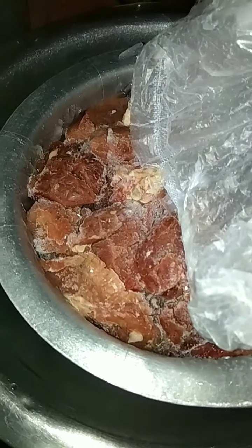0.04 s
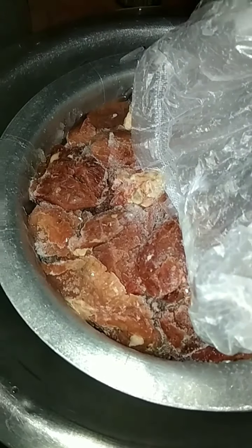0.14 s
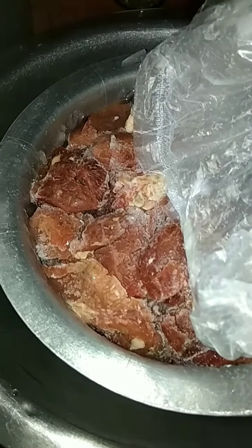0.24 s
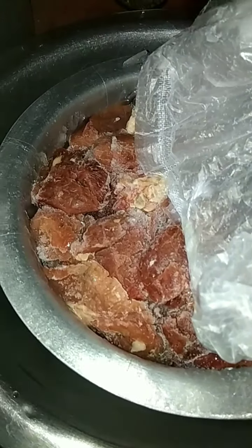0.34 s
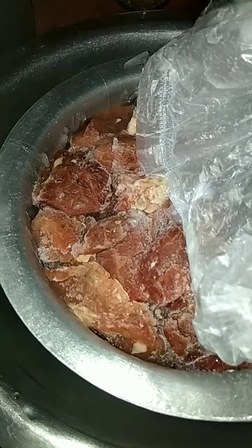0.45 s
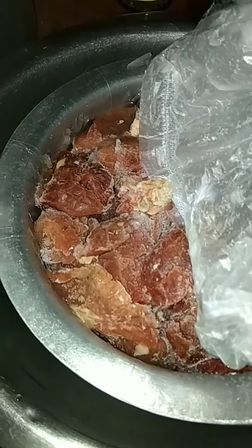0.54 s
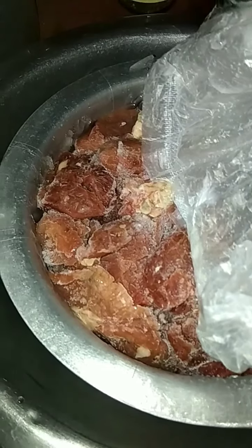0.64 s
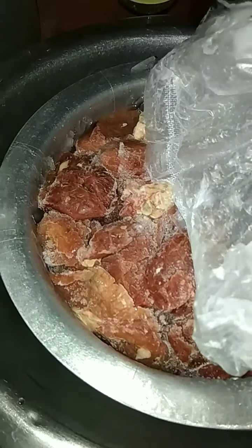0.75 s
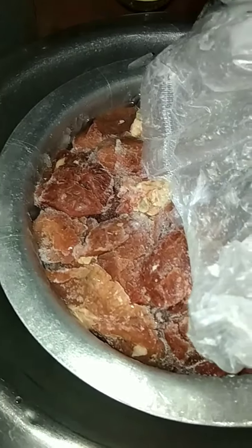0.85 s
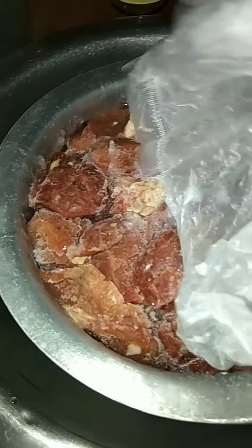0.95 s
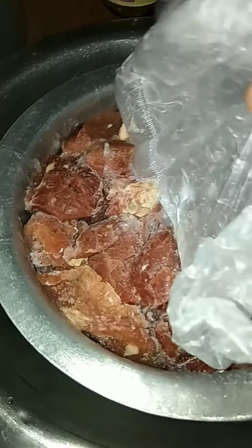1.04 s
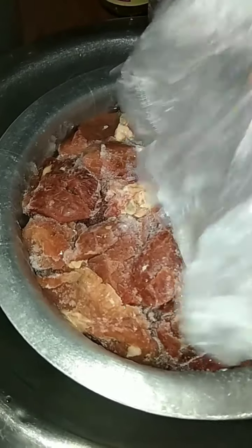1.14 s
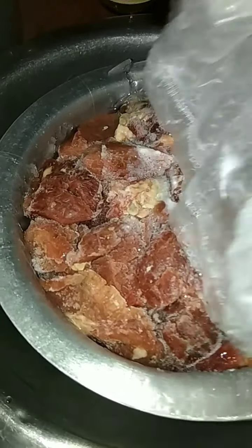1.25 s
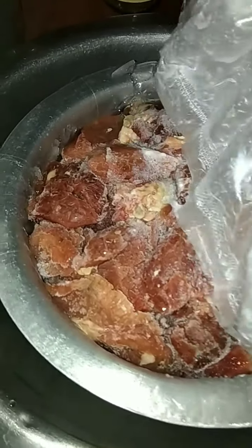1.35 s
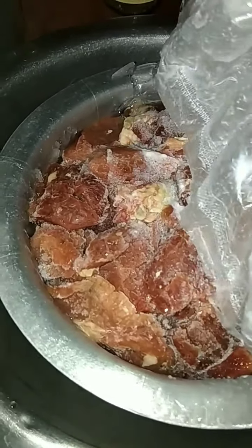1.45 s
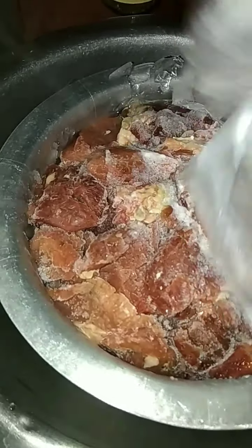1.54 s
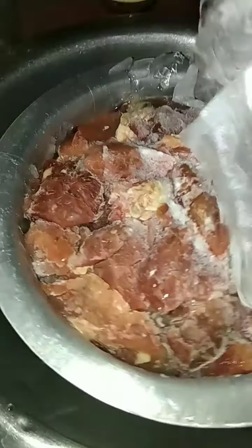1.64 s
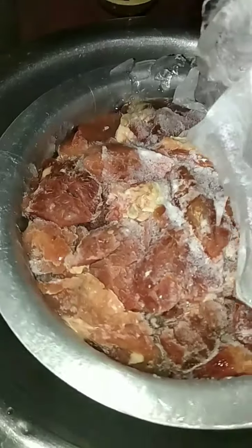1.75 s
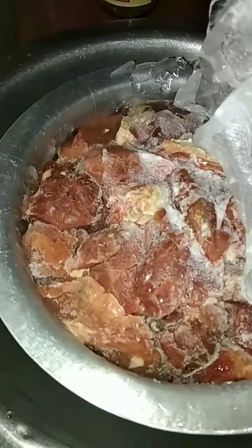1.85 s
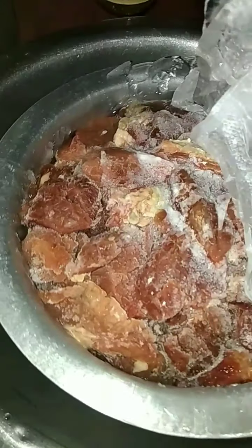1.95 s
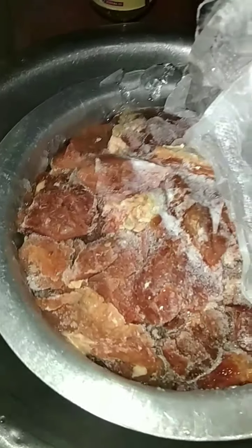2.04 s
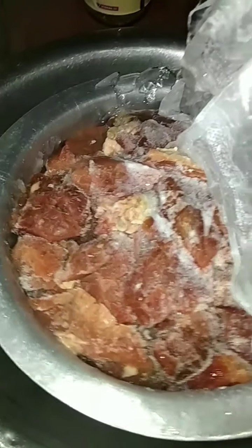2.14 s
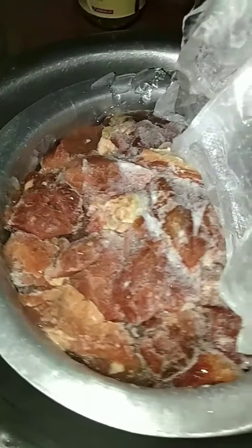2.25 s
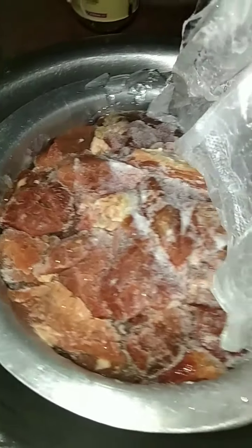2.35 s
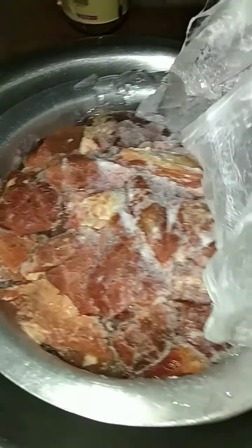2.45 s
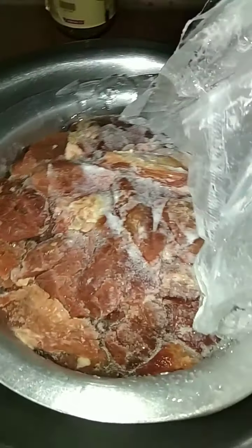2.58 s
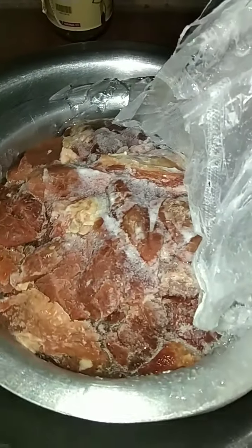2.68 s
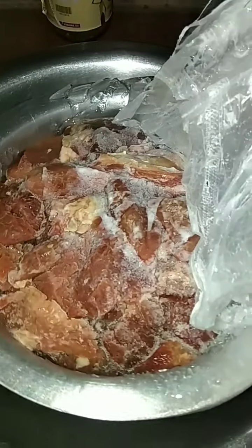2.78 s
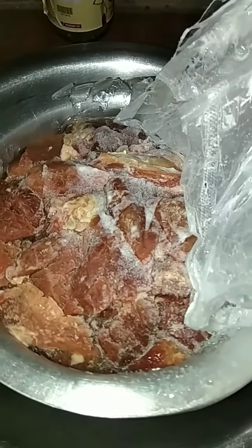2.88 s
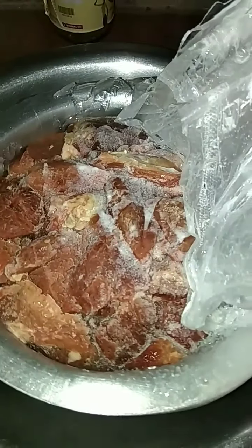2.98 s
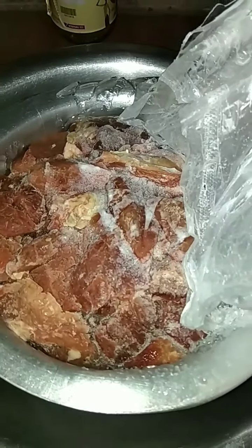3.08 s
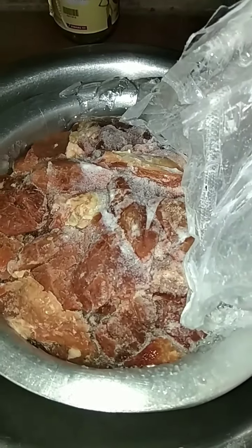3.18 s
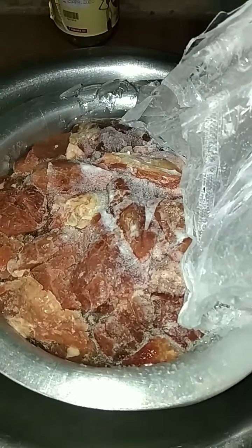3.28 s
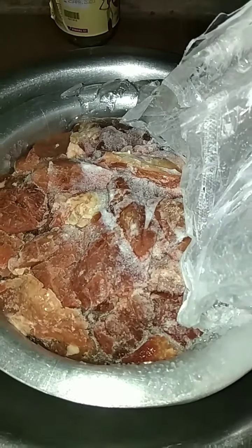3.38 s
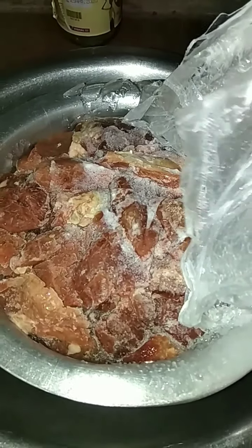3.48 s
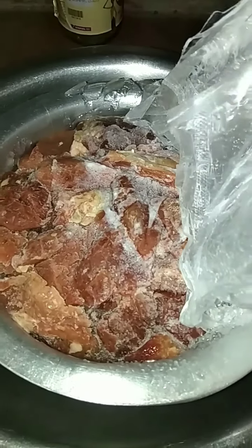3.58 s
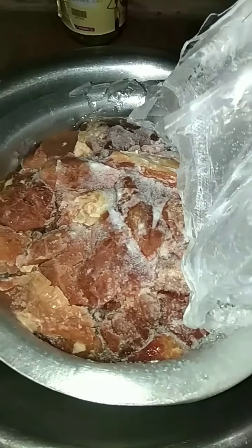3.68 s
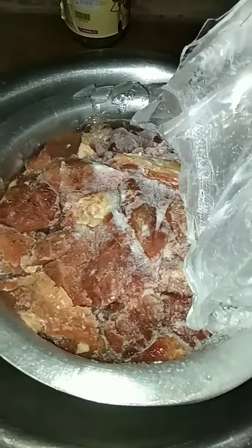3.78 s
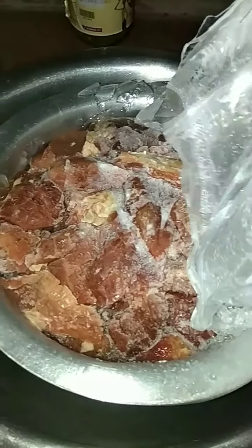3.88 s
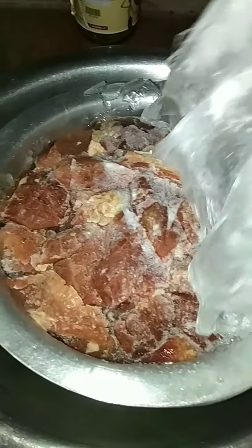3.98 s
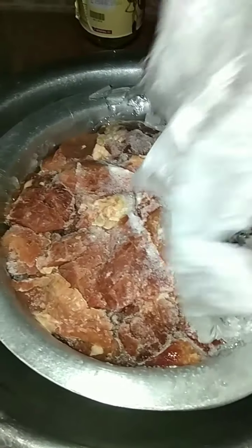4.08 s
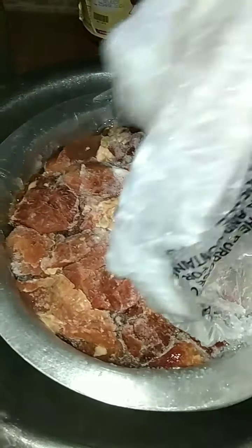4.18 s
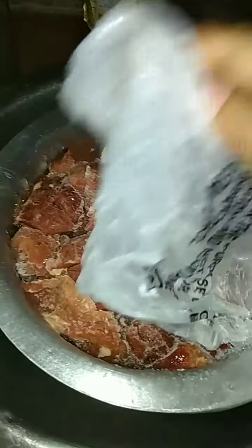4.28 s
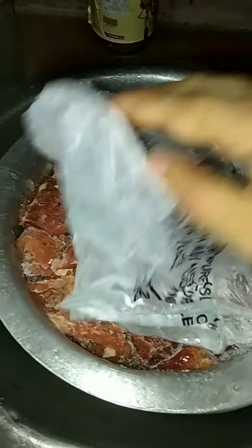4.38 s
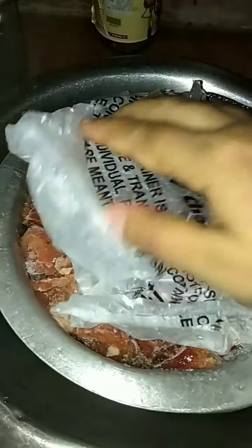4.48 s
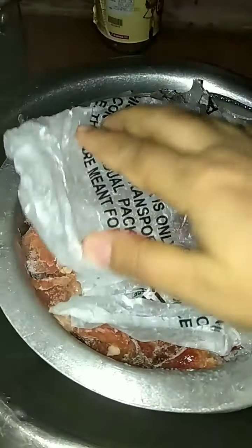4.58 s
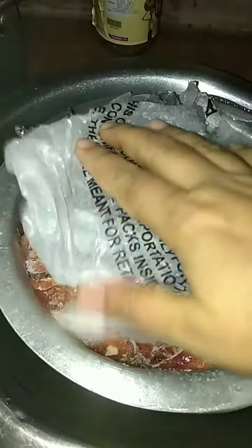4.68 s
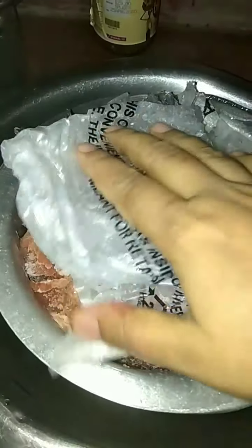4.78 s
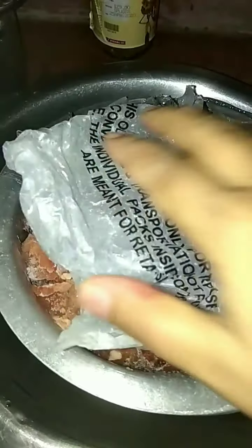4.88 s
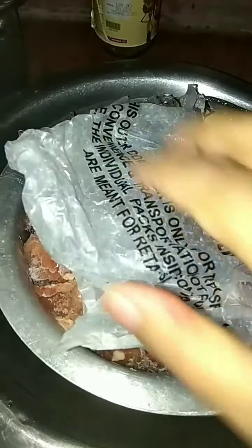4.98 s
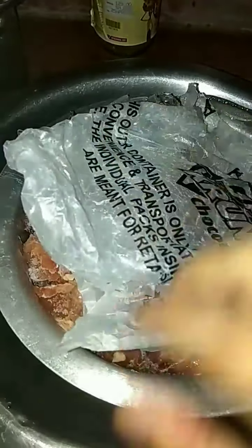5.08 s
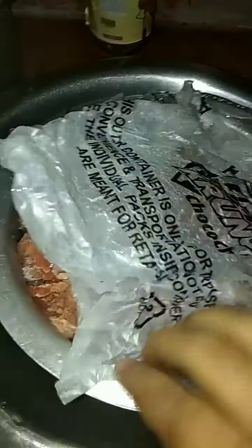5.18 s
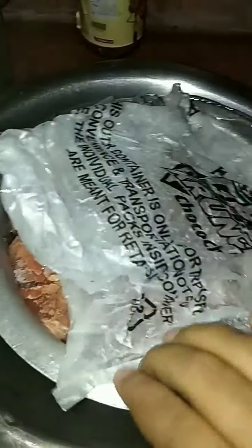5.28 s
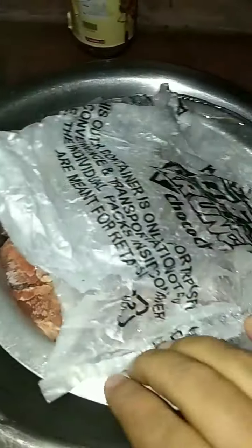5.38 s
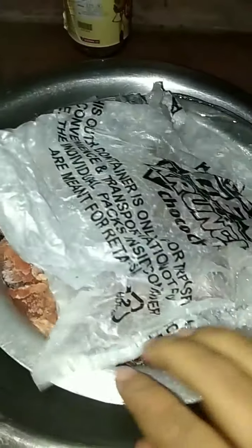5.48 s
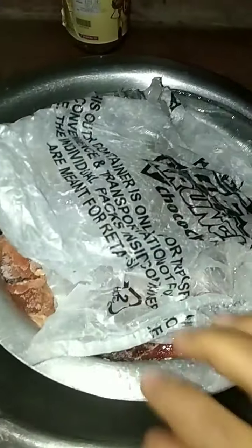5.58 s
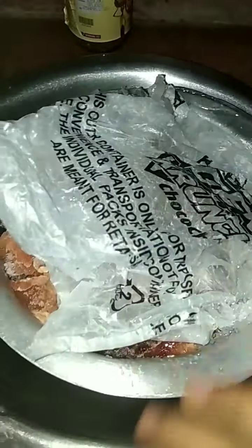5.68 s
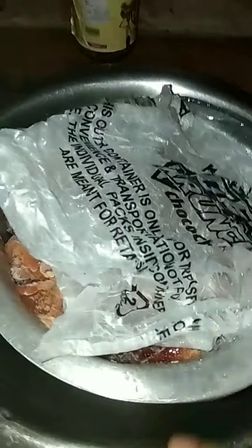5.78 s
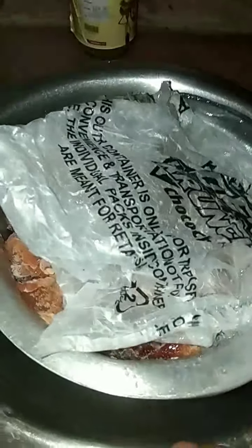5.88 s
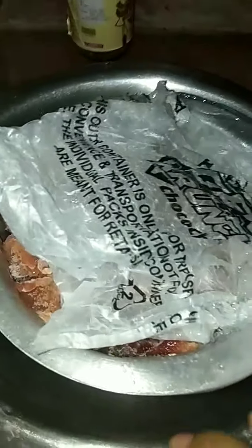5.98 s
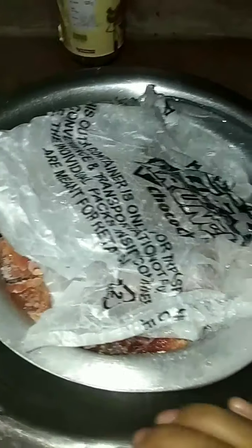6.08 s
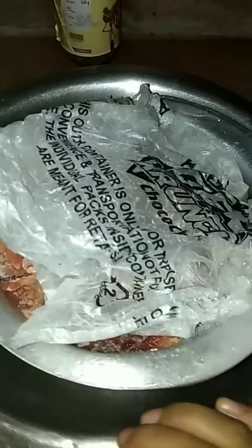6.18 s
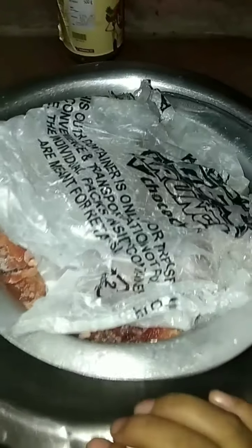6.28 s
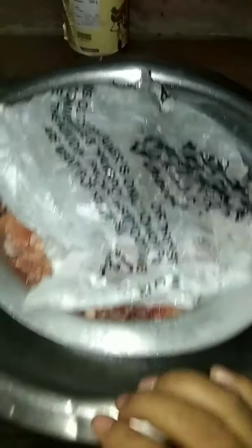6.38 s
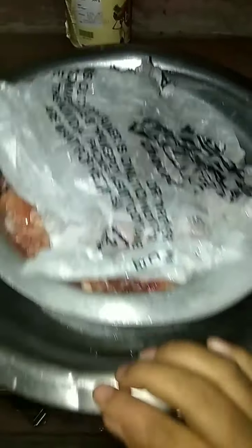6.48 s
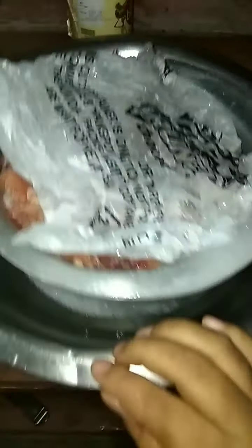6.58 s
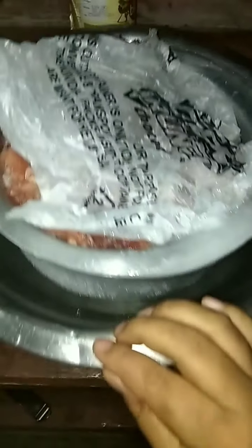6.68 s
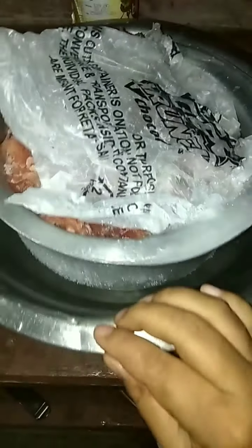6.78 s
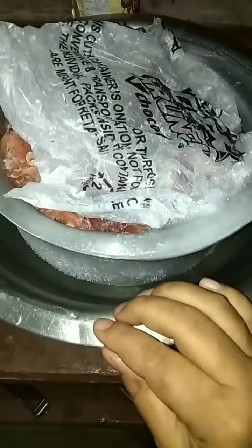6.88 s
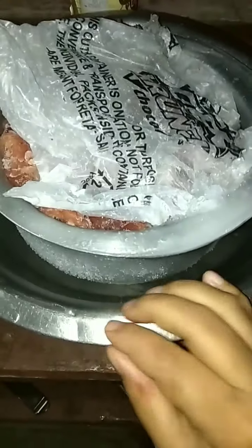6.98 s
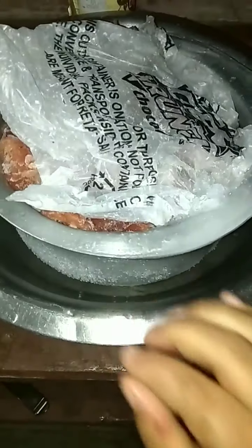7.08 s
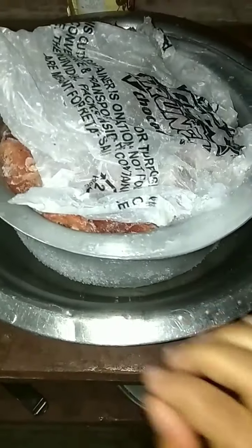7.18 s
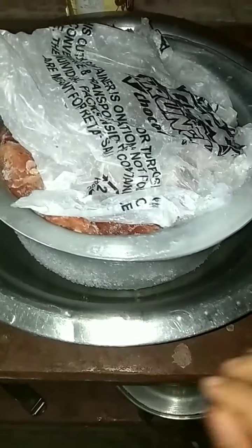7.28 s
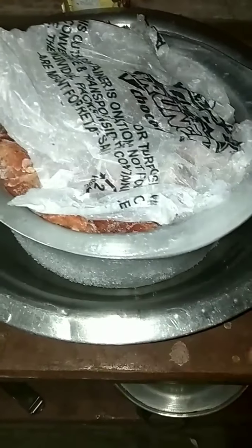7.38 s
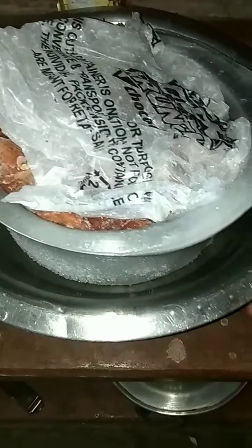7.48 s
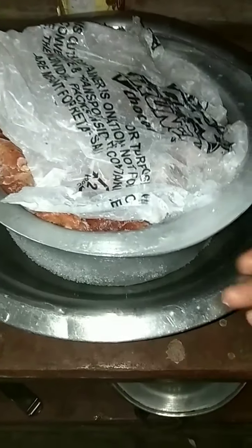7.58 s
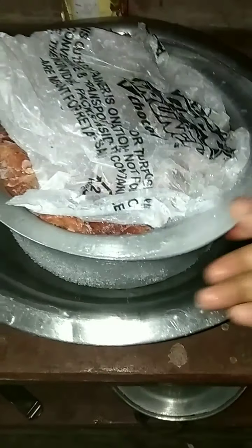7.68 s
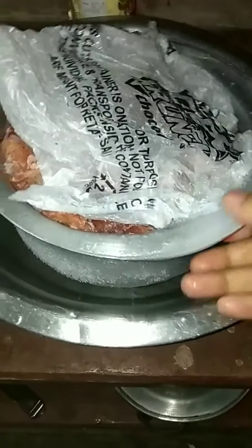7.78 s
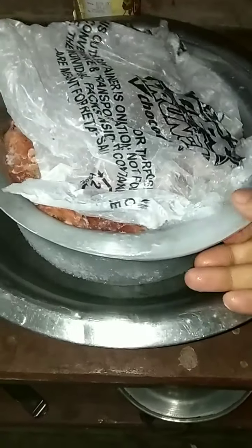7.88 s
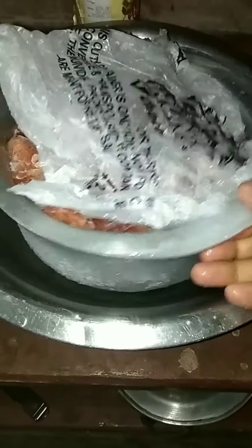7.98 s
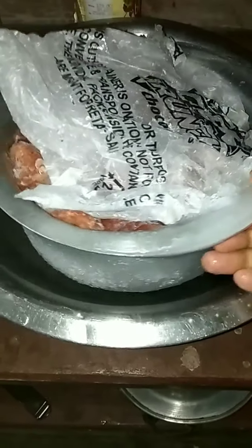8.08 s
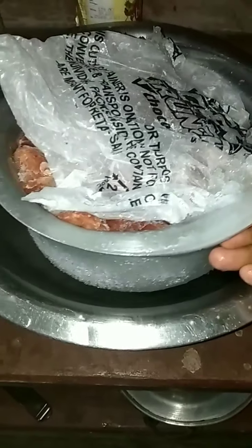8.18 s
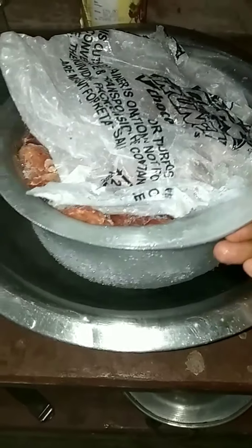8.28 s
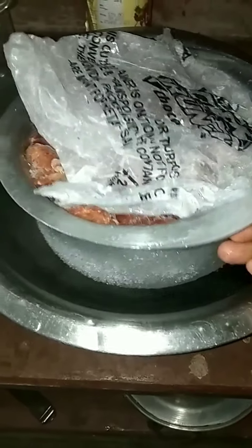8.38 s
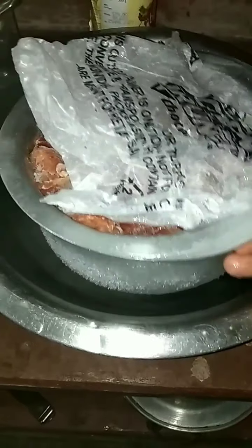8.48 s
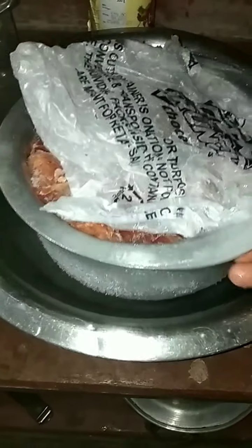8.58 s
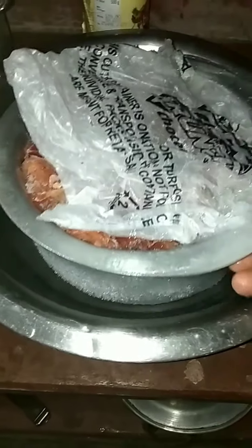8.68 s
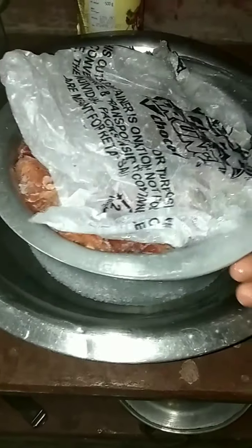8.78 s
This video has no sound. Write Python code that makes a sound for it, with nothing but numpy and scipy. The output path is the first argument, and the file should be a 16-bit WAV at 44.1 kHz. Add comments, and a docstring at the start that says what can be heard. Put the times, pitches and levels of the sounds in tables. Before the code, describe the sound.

Bright, dry plastic crinkling bursts out with sharp snaps, subsides to tiny crackles, then returns in shorter rustles. Two hoarse distant caws overlap the handling. A brief metallic scrape and a cluster of clanks follow, then isolated softer basin knocks over low thuds. Close stereo pickup, small room with short reflections, soft hiss and low hum, occasional faint echoing birdsong from outside.

```python
"""A stiff plastic bag is peeled off frozen meat in a metal bowl, laid back and patted down, close to
two microphone ports a hand apart: creases ring at many pitches, single pops spit bright noise.
Ice pings the bowl; the basin under it is dragged and knocked, ringing metal modes over counter thuds.
Around it: a quiet kitchen of banded noise, hiss and low hum, a far crow of hoarse overtones, and a
small bird outside whose gliding whistle is smeared by echoes."""
import sys
import numpy as np
from scipy import signal
from scipy.fft import rfft, irfft, next_fast_len
from scipy.io import wavfile

SR = 44100
rng = np.random.default_rng(int(sys.argv[2]) if len(sys.argv) > 2 else 0)


def generate_wav(signal):
    """Clip the signal to [-1, 1] and save it as 16-bit WAV at the path in sys.argv[1]."""
    frames = np.transpose(np.atleast_2d(signal))
    scaled = np.clip(frames, -1, 1) * 32767
    pcm = np.round(scaled).astype(np.int16)
    wavfile.write(sys.argv[1], SR, pcm)


N = 389844

# colour of the room tone: (frequency [Hz], relative level [dB])
AIR_COLOUR = [(22, 0.5), (33, -35), (45, -12.5), (90, -17), (140, -18.5), (220, -25.5), (370, -19),
              (600, -23.5), (1300, -28), (2500, -35), (5700, -38.5), (8000, -43), (13000, -42.5)]
# room tone shared by both ports: (frequency [Hz], likeness [0-1])
PORT_LIKENESS = [(60, 0.81), (300, 1), (640, 0.33), (1400, 0.01)]
AIR_DB, AIR_PATCHY_DB = -47.5, 1.2
HISS_HZ, HISS_WIDTH_HZ, HISS_DB = 10040, 1200, -66
HUM_HZ, HUM_WIDTH_HZ, HUM_DB = 57.3, 6.9, -58
HUM_SWING_DB, HUM_PERIOD_S, HUM_TOP_S = 3, 2.43, .47   # a steady swell, first loudest at HUM_TOP_S

# calls of the small bird outside: (start [s], level [dB])
BIRD_CALLS = [(0.155, -51), (3.19, -60.5), (5.89, -57.5), (7.984, -56.5)]
SLUR_S, SLUR_FROM_HZ, SLUR_TO_HZ, SLUR_DB = .095, 5750, 4500, -5
TRILL_S, TRILL_LOW_HZ, TRILL_HIGH_HZ, TRILL_PER_S = .22, 4450, 6550, 42
YARD_FADE_S = .035   # echoes off walls outside

# single creases popping: (time [s], pop level [dB], thick fold part relative to the pop [dB])
CREASE_POPS = [(0.465, -30, -15), (0.5392, -38, -27), (0.572, -34, -18), (0.5932, -28, -15.5),
               (0.6487, -28, -33), (0.7738, -24.5, -13), (1.076, -11, -32), (1.252, -7.5, -35),
               (1.323, -20, -12.5), (1.3807, -16, -35), (1.734, -27, -7), (1.8569, -22, -13.5),
               (2.039, -18.5, -31), (2.3, -26, -12), (2.345, -13.5, -50), (2.4991, -26, -4),
               (2.647, -19, -25), (2.676, -20.5, -16), (2.726, -15.5, -17.5), (2.7893, -24.5, -39),
               (2.875, -31, -26), (3.004, -29, -38), (3.016, -29.5, -12), (3.03, -36, -28),
               (3.119, -30, -14), (3.174, -27, -13.5), (3.1925, -32, -30), (3.24, -31, -37),
               (3.306, -29.5, -9.5), (3.485, -32.5, -9), (3.4955, -32, -25), (3.531, -32, -23),
               (3.68, -31, -11.5), (3.7582, -26.5, -23), (3.8136, -35, -24), (4.251, -18.5, -13),
               (4.421, -12, -16), (4.592, -20, -35), (5.1502, -24, -39), (5.228, -27, -8.5),
               (5.329, -35, -28), (5.521, -29.5, -11), (5.847, -36, -35), (6.2245, -21, -41),
               (6.3877, -12.5, -18), (7.061, -33, -28), (7.497, -35, -17), (8.338, -22, -35),
               (8.527, -43.5, 2), (8.757, -23, -56)]
POPS_PER_S, POP_DB, POP_SPREAD_DB = 110, 4, 3.0   # unlisted pops, against the crinkle level

# long pulls on the film, one curve each (peeling, easing off, laying back, riding the dragged basin):
# (time [s], crinkle level [dB])
FILM_PULLS = [
    [(0.83, -48), (0.855, -36.5), (1.02, -30.5), (1.07, -32), (1.1, -23), (1.2, -22), (1.31, -44.5),
     (1.4, -35.5), (1.495, -31), (1.52, -15.5), (1.555, -19), (1.7, -39.5), (1.86, -45), (1.95, -58.5)],
    [(2.16, -57), (2.29, -49.5), (2.345, -40.5), (2.4, -44), (2.5, -37.5), (2.72, -49), (2.78, -68)],
    [(3.945, -47.5), (3.98, -45), (4.41, -31), (4.655, -41), (4.71, -46.5)],
    [(6.23, -59), (6.32, -39.5), (6.46, -45.5), (6.62, -46), (6.73, -57)],
]
# short crumples that swell, then die away:
# (start [s], swell [s], top level [dB], fade [dB/s], extra thick folds [dB])
FILM_CRUMPLES = [(0.641, 0.0083, -38, 140, 6.5), (1.32, 0.0039, -30, 260, -10),
                 (1.378, 0.0028, -30, 303, -19), (1.931, 0.031, -46, 261, 2), (2.033, 0.002, -48, 352, -3),
                 (2.865, 0.0044, -45, 330, -7.5), (3.009, 0.0079, -50.5, 294, 3),
                 (3.17, 0.048, -56.5, 82, 5.5), (3.47, 0.051, -54, 145, 4.5), (3.74, 0.021, -56.5, 52, 4),
                 (4.713, 0.003, -38.5, 250, -3), (4.724, 0.026, -32, 400, -0.5), (4.78, 0.03, -40, 199, 3),
                 (5.133, 0.024, -35.5, 160, 0), (5.15, 0.032, -36, 216, -1.5), (5.3, 0.017, -48.5, 250, 1),
                 (5.44, 0.067, -46, 220, -1.5), (6.223, 0.0037, -46.5, 348, 6),
                 (6.734, 0.0047, -36, 300, 1.5), (6.778, 0.0071, -41, 260, 2),
                 (7.997, 0.002, -44.5, 330, 5.5), (8.307, 0.042, -40, 518, 4), (8.428, 0.011, -52, 248, 6),
                 (8.746, 0.014, -43, 260, 0)]
# colour of the crinkling film: (frequency [Hz], relative level per Hz [dB])
FILM_COLOUR = [(290, -36), (500, 2), (678, -16), (819, -18.5), (1260, -16), (1400, -15.5), (3020, -17),
               (6510, -9.5), (10100, -3.5), (13300, 3), (16000, -1.5)]
SWELL_DB = 20   # a crumple starts this far under its top
# level of the duller crackle against the bright at a crinkle level of FIRM_DB,
# and its change per dB of crinkle level
FOLDS_DB, FOLDS_PER_DB, FIRM_DB = -10.5, -0.0869, -28
BOOM_LAG_S, BOOM_FOLLOWS = 0.0011, 1.2   # the bowl answers late, and most to firm handling

# ice cracking off the bowl: (time [s], level [dB])
ICE_CRACKS = [(0.652, -41), (0.683, -40)]
# modes of the bowl: (frequency [Hz], relative level [dB], t60 [s])
BOWL_MODES = [(2104, 2, 0.19), (2840, -5, 0.12), (3750, -2.5, 0.16)]

# lurches of the counter: (start [s], level [dB])
COUNTER_JOLTS = [(1.14, -38), (1.55, -32.5), (6.95, -45.5), (8.02, -40.5), (8.75, -37.5)]
JOLT_HZ, JOLT_WIDTH_HZ, JOLT_SWELL_S = 54, 20, 0.048

# caws of the crow outside: (start [s], loudest [s], end [s], level [dB])
CROW_CAWS = [(4.698, 4.762, 5.085, -42.5), (5.323, 5.56, 5.8, -45.5)]
# overtones of the caw: (frequency [Hz], width [Hz], relative level [dB])
CAW_OVERTONES = [(1070, 45, 2.5), (1603, 90, 8.5), (1930, 150, 10.5), (2110, 140, 10.5)]

# the basin dragged over the counter: (time [s], scrape level [dB], mode driven best [Hz])
BASIN_DRAG = [(6.22, -59, 1010), (6.23, -45, 1000), (6.29, -41, 930), (6.33, -46, 960), (6.39, -44, 940),
              (6.42, -53, 920), (6.62, -57, 850), (6.64, -41, 1014), (6.665, -45, 975), (6.685, -41, 980),
              (6.71, -56, 900)]
# basin knocks: (time [s], metal level [dB], counter thud level [dB], mode driven best [Hz],
# share of the ring time the hand leaves [0-1])
BASIN_KNOCKS = [(6.2259, -35.5, -47, 1040, 0.3), (6.741, -25, -41, 1100, 0.34), (6.757, -43, -30, 1250, .3),
                (6.783, -22.5, -55, 1240, 0.61), (6.804, -40, -43, 1200, 0.9),
                (6.858, -37, -33.5, 890, 0.17), (6.884, -37.5, -35.5, 855, 0.26),
                (6.948, -46, -32.5, 835, 0.17), (7.501, -40, -50.5, 724, 0.13),
                (8.026, -28.5, -41, 550, 0.28), (8.049, -41, -33.5, 1390, 0.45),
                (8.334, -38, -52, 1300, 0.27), (8.444, -34, -47, 1370, 0.25), (8.559, -50, -41, 703, 0.2),
                (8.738, -30, -38, 570, 0.43), (8.76, -28, -37, 1230, 0.23), (8.783, -36, -37, 1000, 0.35),
                (8.812, -46, -47, 988, 0.4)]
# modes of the basin: (frequency [Hz], relative level [dB], free t60 [s])
BASIN_MODES = [(517, 9, 0.15), (826, 7, 0.25), (872, 5, 0.22), (933, 9, 0.2), (990, 9, 0.2),
               (1250, 10, 0.16), (1326, 9, 0.4), (1500, 14, 0.04), (1700, 8, .06), (2320, 6, 0.07),
               (5000, 9, 0.087)]
# thud modes of the counter: (frequency [Hz], relative level [dB], t60 [s])
COUNTER_MODES = [(149, -7.5, 0.095), (217, 0.5, 0.04), (290, -3.5, 0.2), (442, -19, 0.012)]
DRAG_RING_SHARE = .2   # the hand on the rim damps the ring
FOOT_DB_PER_OCTAVE = 80   # how narrowly the dragging foot picks its mode
GRIT_DB, GRIT_FOLLOWS = -47, 0.1   # broad rasp under the dragged foot

LEFT_LAG_S, LAG_SPREAD_S, LEFT_DB = .0003, .00015, -2.5   # left port against right
KITCHEN_T60_S, WALL_CUT_HZ, KITCHEN_DB = 0.11, 15700, -2.5
PORT_HZ, PORT_WIDTH_HZ, PORT_DB = 11100, 2100, 0.5   # resonance of the microphone ports
CUTOFF_HZ = 16700


def from_db(db):
    """Decibels to gain."""
    return 10 ** (np.asarray(db) / 20)


def lean_right(db):
    """Gains of the left and right port, this far either side of even."""
    return from_db([[-db], [db]])


def rms_one(x):
    """Scale to unit rms."""
    return x / np.sqrt(np.mean(x ** 2) + 1e-20)


def in_time(rows):
    """Columns of a curve table, sample by sample; -120 outside its span."""
    s, *columns = np.transpose(rows)
    return [np.interp(np.arange(N) / SR, s, c, left=-120, right=-120) for c in columns]


def at_hz(points, hz):
    """Read a table on a log-frequency axis."""
    table_hz, values = np.transpose(points)
    return np.interp(np.log(hz), np.log(table_hz), values)


def drift(rate):
    """Slow chance of spread 1, from low-passed noise drawn every 40 samples."""
    r = np.exp(-80 * np.pi * rate / SR)
    noise = rng.standard_normal(N // 40 + 2002)
    slow = signal.lfilter([1], [1, -2 * r, r * r], noise)[2000:]
    return np.interp(np.arange(N) / 40, np.arange(len(slow)), rms_one(slow))


def filtered(x, order, hz, kind):
    """Butterworth filter."""
    return signal.sosfilt(signal.butter(order, hz, kind, fs=SR, output="sos"), x)


def ring(force, hz, t60):
    """A damped mode: a unit click sets a sine of height 1 ringing."""
    r, w = from_db(-60 / (t60 * SR)), 2 * np.pi * hz / SR
    return signal.lfilter([0, np.sin(w)], [1, -2 * r * np.cos(w), r * r], force + 1e-18)


def resonance(force, hz, width_hz):
    """A mode given by its bandwidth instead of its ring time."""
    return ring(force, hz, np.log(1000) / (np.pi * width_hz))


def rising_noise():
    """Noise that weakens toward the bass."""
    return np.diff(rng.standard_normal(N + 1))


def blows(times, levels_db):
    """One click of force per event."""
    out = np.zeros(N)
    np.add.at(out, np.round(times * SR).astype(int), from_db(levels_db))
    return out


def bursts(times, levels_db, length):
    """Noise that starts at once and dies away: the force of rough contacts."""
    out = np.zeros(N + SR)
    noise = rng.standard_normal(N + SR)
    t = np.arange(SR // 8) / SR
    for s, db in zip(times, levels_db):
        i = round(s * SR)
        spit = np.exp(-t / length) * noise[i:i + len(t)]
        even_energy = np.sqrt(length * SR / 2 / np.sum(spit ** 2))
        out[i:i + len(t)] += from_db(db) * spit * even_energy
    return out[:N]


def at_ports(x):
    """A fixed source reaches the left port later and weaker."""
    late = np.interp(np.arange(N) - LEFT_LAG_S * SR, np.arange(N), x)
    return np.array([late, x]) * lean_right(-LEFT_DB / 2)


def room_tone():
    """Half-octave bands of stereo noise, alike at both ports only in the bass, with hiss and hum."""
    air = 0
    white = rng.standard_normal((2, 2, N))
    for k, low in enumerate(20 * 2 ** np.arange(0, 10, .5)):
        mid, side = filtered(white[k % 2], 2, [low, low * np.sqrt(2)], "band")
        hz = low * 2 ** .25
        alike = at_hz(PORT_LIKENESS, hz)
        band = np.sqrt(1 + alike) * mid + np.sqrt(1 - alike) * side * [[1], [-1]]
        air = air + from_db(at_hz(AIR_COLOUR, hz) + AIR_PATCHY_DB * drift(12.3)) * band
    air = filtered(air, 12, 14300, "low")
    hiss_band = [HISS_HZ - HISS_WIDTH_HZ / 2, HISS_HZ + HISS_WIDTH_HZ / 2]
    hiss = filtered(white[0, :, ::-1], 2, hiss_band, "band")   # time-reversed, so unlike the air
    swing = np.cos(2 * np.pi * (np.arange(N) / SR - HUM_TOP_S) / HUM_PERIOD_S)
    hum = rms_one(resonance(rising_noise(), HUM_HZ, HUM_WIDTH_HZ))
    hum = from_db(HUM_DB + HUM_SWING_DB * swing) * hum * lean_right(1.2)
    return from_db(AIR_DB) * rms_one(air) + from_db(HISS_DB) * rms_one(hiss) + hum


def bird():
    """A falling whistle, then a fast trill, smeared by echoes that differ at each port."""
    t = np.arange(round((SLUR_S + TRILL_S) * SR)) / SR
    slurring = t < SLUR_S
    slur_hz = np.interp(t, [0, SLUR_S], [SLUR_FROM_HZ, SLUR_TO_HZ])
    calls = np.zeros(N + SR)
    for start, db in BIRD_CALLS:
        beat = 2 * np.pi * TRILL_PER_S * np.cumsum(1 + .3 * drift(30)[:len(t)]) / SR
        trill_depth = np.abs(np.sin(beat / 2)) * np.clip((t - SLUR_S) / .05, 0, 1)
        trill_hz = TRILL_LOW_HZ + (TRILL_HIGH_HZ - TRILL_LOW_HZ) * trill_depth
        hz = np.where(slurring, slur_hz, trill_hz) + 150 * drift(150)[:len(t)]   # a hoarse throat
        edges = np.clip(np.minimum(t, t[-1] - t) / .03, 0, 1)
        shape = np.where(slurring, from_db(SLUR_DB), 1) * edges
        i = round(start * SR)
        calls[i:i + len(t)] += from_db(db) * shape * np.sin(2 * np.pi * np.cumsum(hz) / SR)
    echoes = rng.standard_normal((2, SR // 4)) * np.exp(-np.arange(SR // 4) / SR / YARD_FADE_S)
    echoes = echoes / np.sqrt(YARD_FADE_S * SR / 4)
    return signal.fftconvolve(calls[None], echoes, axes=1)[:, :N]


def handling():
    """Crinkle level and fold share: the strongest pull or crumple rules at each moment."""
    t = np.arange(N) / SR
    level_db = np.max([in_time(pull)[0] for pull in FILM_PULLS], axis=0)
    extra_db = np.zeros(N)
    for start, swell, top_db, fade, more_folds_db in FILM_CRUMPLES:
        corners_s = [start, start + swell, start + swell + 1]
        crumple_db = np.interp(t, corners_s, [top_db - SWELL_DB, top_db, top_db - fade], left=-120)
        extra_db = np.where(crumple_db > level_db, more_folds_db, extra_db)
        level_db = np.maximum(level_db, crumple_db)
    above_firm_db = np.maximum(level_db, -80) - FIRM_DB
    return level_db, FOLDS_DB + FOLDS_PER_DB * above_firm_db + extra_db


def snaps(level_db):
    """A pop spits bright noise, with a duller part from the fold; more come at random under the hand."""
    at = np.flatnonzero((rng.random(N) < POPS_PER_S / SR) & (level_db > -60))
    luck = rng.standard_normal((N, 2))[at]
    s, pop_db, fold_db = np.transpose(CREASE_POPS)
    s = np.append(s, at / SR)
    fold_db = np.append(fold_db, fold_db.mean() + 6 * luck[:, 1])
    pop_db = np.append(pop_db, level_db[at] + POP_DB + POP_SPREAD_DB * luck[:, 0])
    bright = filtered(bursts(s, pop_db - 4.5, 0.0016), 2, [6500, 16000], "band")
    dull = filtered(bursts(s, pop_db + fold_db + 10, 0.0016), 1, [1500, 5500], "band")
    return at_ports(bright + dull)


def crinkle(level_db, folds_db, per_s, uneven_db, clump_db, fold_db, cycles):
    """Creases buckle at random spots of the film, each ringing briefly at its own pitch."""
    busy = from_db(0.37 * np.clip(level_db + 31, -30, 0))   # gentle handling leaves gaps
    chance = busy * per_s * from_db(clump_db * drift(40)) / SR
    at = np.flatnonzero(rng.random(N) < chance)
    sizes = from_db(uneven_db * np.minimum(rng.exponential(1, len(at)), 4))
    sizes = sizes * rng.choice([-1, 1], len(at)) / np.sqrt(busy[at])
    lags_s = LEFT_LAG_S + LAG_SPREAD_S * rng.standard_normal(len(at))   # spot by spot
    at_left = np.clip(at + np.round(lags_s * SR).astype(int), 0, N - 1)
    pitches = np.linspace(np.sqrt(700), np.sqrt(15800), 56) ** 2
    dealt = rng.integers(0, 56, len(at))
    thin, thick = np.zeros((2, 2, N))
    for k, hz in enumerate(pitches):
        clicks, mine = np.zeros((2, N)), dealt == k
        # folds of one size crackle in spells of their own
        spells = sizes[mine] * from_db(fold_db * drift(5.6)[at[mine]])
        clicks[0, at_left[mine]] = spells
        clicks[1, at[mine]] = spells
        sound = rms_one(ring(clicks, hz, cycles / hz + 0.0021))
        sound = sound * from_db(at_hz(FILM_COLOUR, hz)) * hz ** .25   # pitches lie wider apart higher up
        thick_share = 1 / (1 + (hz / 5500) ** 4)
        thick += thick_share * sound
        thin += (1 - thick_share) * sound
    both = rms_one(thin) + from_db(folds_db + 8.0) * rms_one(thick)
    both = filtered(both, 2, 550, "high")   # thin film radiates no bass
    return from_db(level_db) * both * lean_right(-LEFT_DB / 2)


def bowl_boom(level_db):
    """The bowl booms as the film is worked: two low resonances, the long waves alike at both ports."""
    shaken = rising_noise()
    boom = rms_one(ring(shaken, 373, 0.026) - 1.08 * ring(shaken, 153, 0.022))
    r = np.exp(-1 / (BOOM_LAG_S * SR))
    answer = signal.lfilter([1 - r], [1, -r], from_db(BOOM_FOLLOWS * (level_db - FIRM_DB)))
    return boom * answer * from_db(-42.0 + 2.0 * drift(6.8)) * lean_right(.8)


def bowl():
    """The cracking ice pings the bowl: each click rings its metal modes."""
    force = blows(*np.transpose(ICE_CRACKS))
    return sum(ring(from_db(db) * force, hz, t60) for hz, db, t60 in BOWL_MODES) * lean_right(1.5)


def jolts():
    """The counter lurches: a deep, soft wobble swells and dies each time."""
    t = np.arange(N) / SR
    swell = 0
    for start, db in COUNTER_JOLTS:
        age = np.maximum(t - start, 0) / JOLT_SWELL_S
        swell = swell + from_db(db) * age * np.exp(1 - age)
    wobble = rms_one(resonance(rising_noise(), JOLT_HZ, JOLT_WIDTH_HZ))
    return swell * wobble * lean_right(1.2)


def crow():
    """Hoarse overtones, blurred by distance, swelling and fading with each caw."""
    t = np.arange(N) / SR
    caw = sum(from_db(db) * np.interp(t, [start, top, end], [0, 1, 0]) for start, top, end, db in CROW_CAWS)
    noise = rng.standard_normal((2, N))
    voice = sum(from_db(db) * rms_one(resonance(noise, hz, width)) for hz, width, db in CAW_OVERTONES)
    return caw * rms_one(voice)


def dragged_basin():
    """Stick-slip under the foot rings the basin modes near its pitch, over a broad gritty rasp."""
    slips = (rng.random(N) < 500 / SR) * rng.standard_normal((2, N)) * from_db(3.0 * drift(25))
    scrape_db, foot_hz = in_time(BASIN_DRAG)
    dragged = 0
    for hz, db, t60 in BASIN_MODES:
        octaves_off = np.abs(np.log2(hz / np.abs(foot_hz)))   # abs: the table reads -120 outside the drag
        pick_db = -np.minimum(FOOT_DB_PER_OCTAVE * octaves_off, 18)
        force = slips * from_db(scrape_db + db + pick_db - 7.5)
        dragged = dragged + ring(force, hz, DRAG_RING_SHARE * t60)
    grit_db = GRIT_DB + GRIT_FOLLOWS * (scrape_db - np.max(scrape_db)) + 2.0 * drift(30)
    grit = rng.standard_normal((2, N)) * (scrape_db > -100) * from_db(grit_db)
    return dragged + filtered(grit, 2, [1100, 2800], "band") * np.sqrt(SR / 3400)


def knocked_basin():
    """Each knock rings the metal modes, favouring those near the spot struck, with a rattle."""
    struck, t = np.zeros((2, N + SR)), np.arange(SR // 2) / SR
    hz, db, t60 = np.transpose(BASIN_MODES)[:, :, None]
    luck = rng.standard_normal((len(BASIN_KNOCKS), 3, len(BASIN_MODES), 1))
    for (start, metal_db, _, best_hz, free), sides in zip(BASIN_KNOCKS, luck):
        off_spot_db = 16 * np.minimum(np.abs(np.log2(hz / best_hz)), .8)
        decay_db = 60 * t / (free * t60)
        tones = np.sin(2 * np.pi * hz * (1 + .008 * sides[2]) * t) * (1 - np.exp(-t / .0008))
        rings = tones * from_db(metal_db + db - 4.5 - off_spot_db - decay_db)
        for side, lag in enumerate((LEFT_LAG_S, 0)):
            i = round((start + lag) * SR)
            uneven = from_db(3 * sides[side]) * np.sign(sides[0])   # a wide rim radiates modes unevenly
            struck[side, i:i + len(t)] += np.sum(rings * uneven, axis=0)
    s, metal_db, *_ = np.transpose(BASIN_KNOCKS)
    rattle = np.array([bursts(s, metal_db - 2.5, 0.018) for _ in range(2)])   # ice and bowl jump
    return struck[:, :N] + filtered(rattle, 1, [500, 3000], "band")


def counter_thuds():
    """The counter thuds under knocks in a few low modes; long waves reach both ports alike."""
    s, _, thud_db, *_ = np.transpose(BASIN_KNOCKS)
    force = blows(s, thud_db + 4.0) + bursts(s, thud_db - 25, .018)   # the foot lands, then judders
    thuds = sum((-1) ** k * ring(from_db(db) * force, hz, t60)
                for k, (hz, db, t60) in enumerate(COUNTER_MODES))
    return filtered(thuds, 2, 700, "low") * lean_right(.8)   # the contact is soft


def kitchen(x):
    """Reflections: six feedback delays a side, duller on every round."""
    size = next_fast_len(N + SR)
    w = 2 * np.pi * np.arange(size // 2 + 1) / size
    dull = 1 / np.sqrt(1 + (w * SR / (2 * np.pi * WALL_CUT_HZ)) ** 2)
    spectrum = rfft(x, size)
    out = []
    for lags in rng.uniform(.006, .025, (2, 6)):
        echoes = 0
        for k, lag in enumerate(lags):
            one_round = from_db(-60 * lag / KITCHEN_T60_S) * dull * np.exp(-1j * w * round(lag * SR))
            echoes = echoes + (-1) ** k * one_round / (1 - one_round)
        out.append(irfft(spectrum * echoes, size)[:N])
    return np.array(out)


def scene():
    """Bag, bowl, basin and counter close by in the kitchen, the birds farther off."""
    level_db, folds_db = handling()
    film = crinkle(level_db, folds_db, per_s=10000., uneven_db=2.2, clump_db=2.2, fold_db=3.5, cycles=14.)
    echoed = film + snaps(level_db) + bowl() + crow() + dragged_basin() + knocked_basin()
    low = bowl_boom(level_db) + jolts() + counter_thuds()
    reflections = from_db(KITCHEN_DB) * kitchen(echoed.mean(axis=0))
    return echoed + low + reflections + bird() + room_tone()


def record(dry):
    """The microphone ports lift a treble band, peaks are rounded, the top is cut steeply."""
    ringing = resonance(dry, PORT_HZ, PORT_WIDTH_HZ) * np.pi * PORT_WIDTH_HZ / SR
    lift = np.diff(ringing, prepend=0) / (2 * np.sin(np.pi * PORT_HZ / SR))   # in phase with the sound
    heard = .95 * np.tanh((dry + from_db(PORT_DB) * lift) / .95)
    return signal.sosfilt(signal.cheby2(16, 90, CUTOFF_HZ, fs=SR, output="sos"), heard)


dry = scene()
out = record(dry)
generate_wav(out)
```